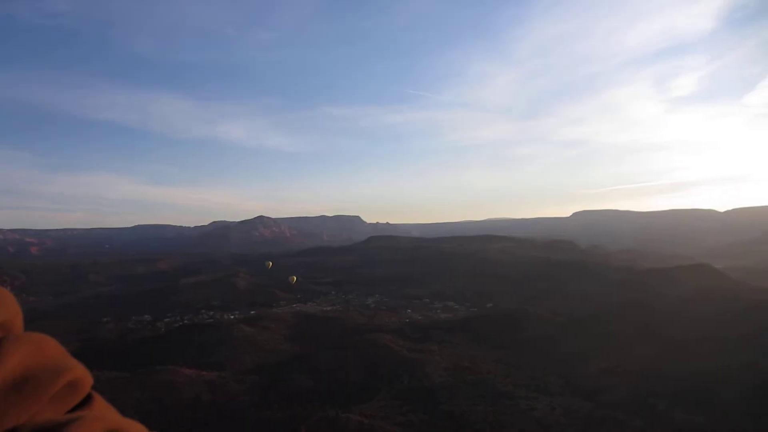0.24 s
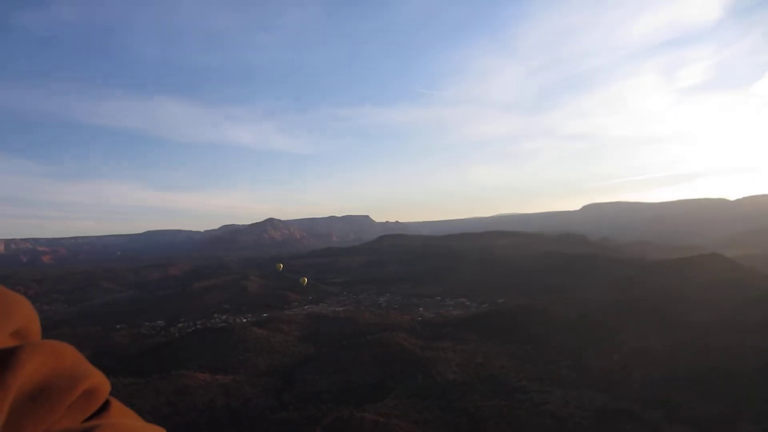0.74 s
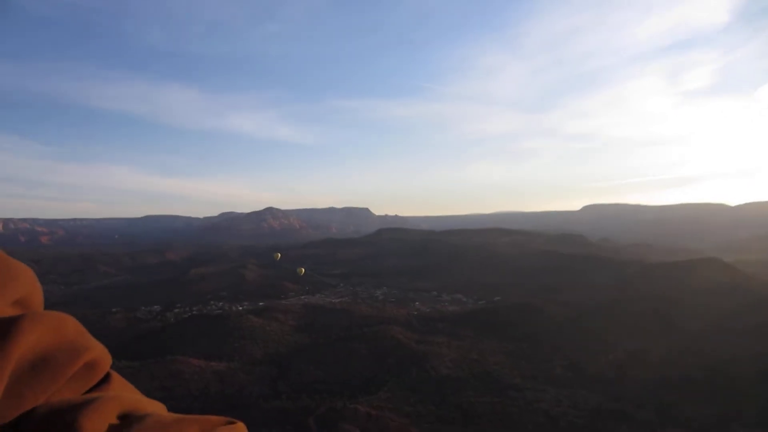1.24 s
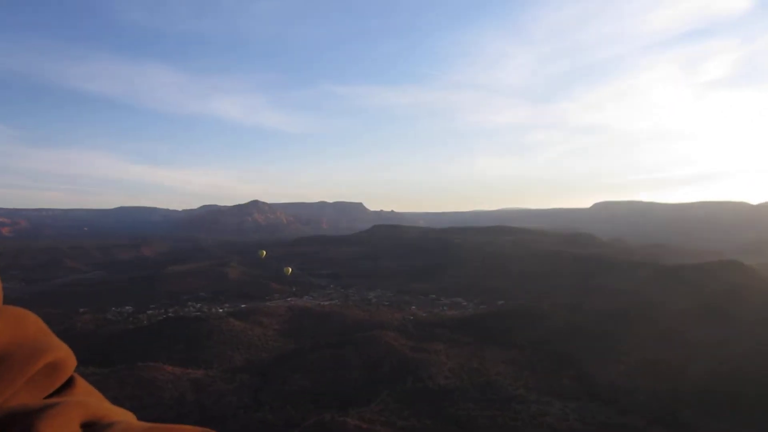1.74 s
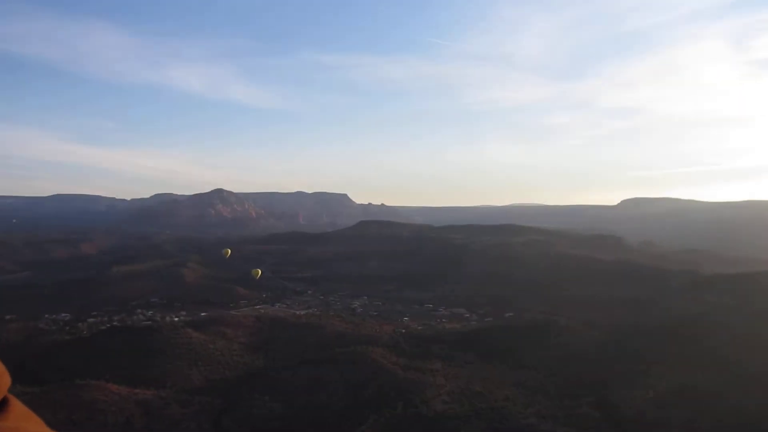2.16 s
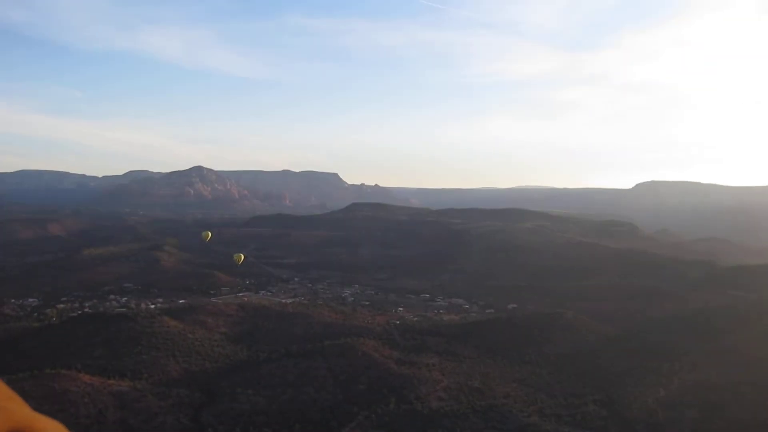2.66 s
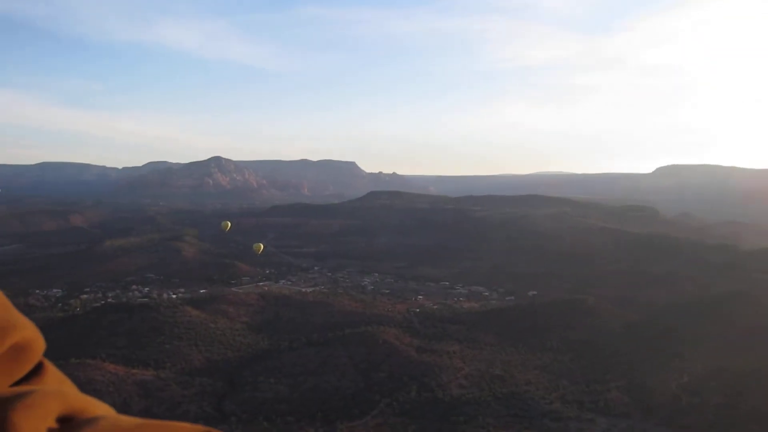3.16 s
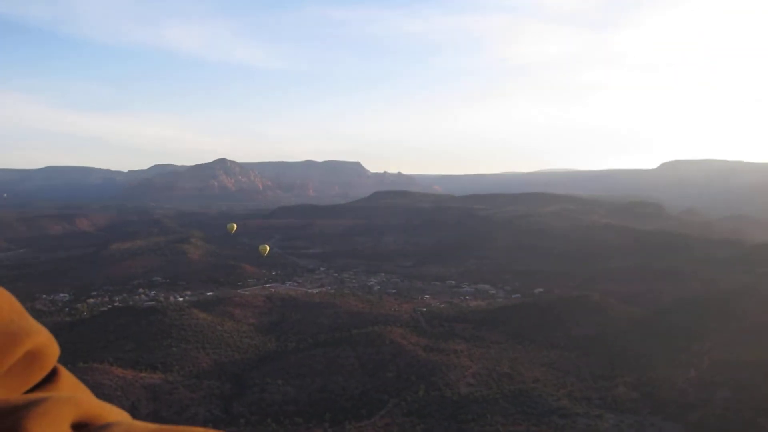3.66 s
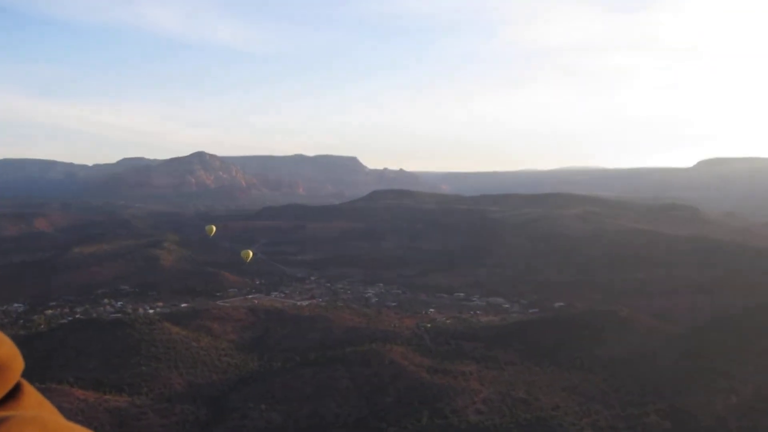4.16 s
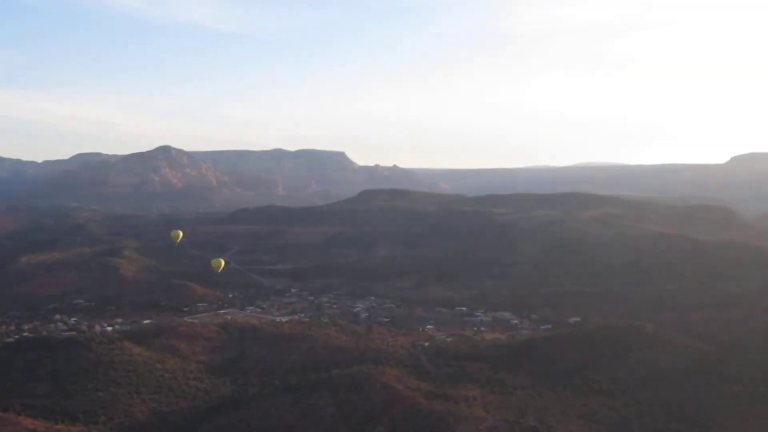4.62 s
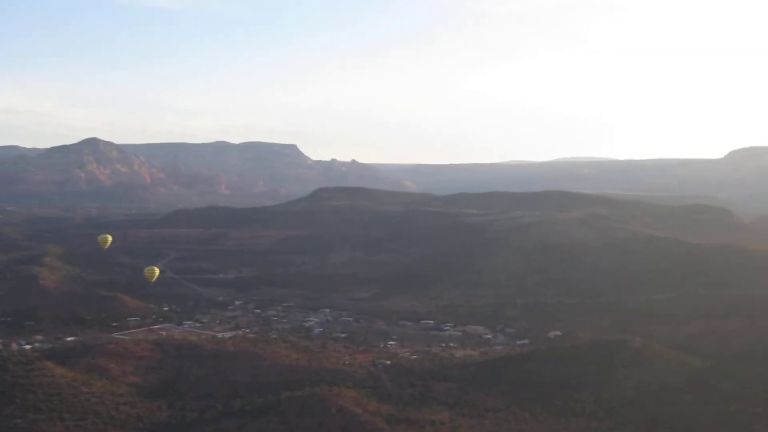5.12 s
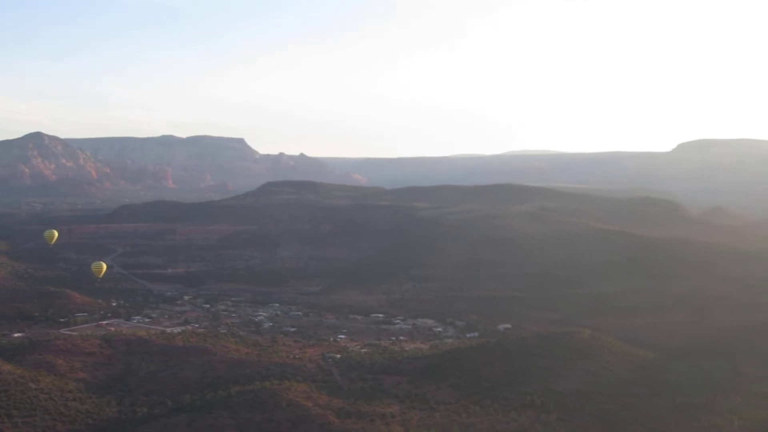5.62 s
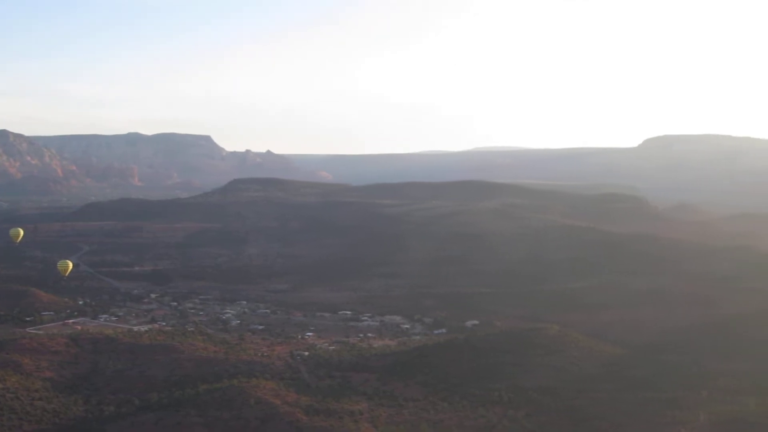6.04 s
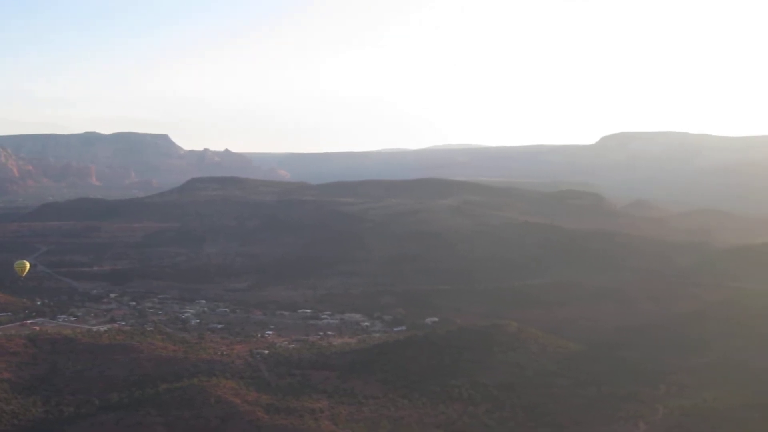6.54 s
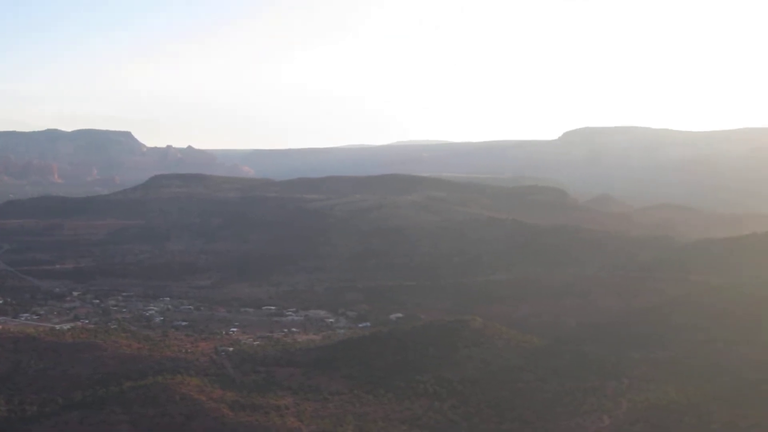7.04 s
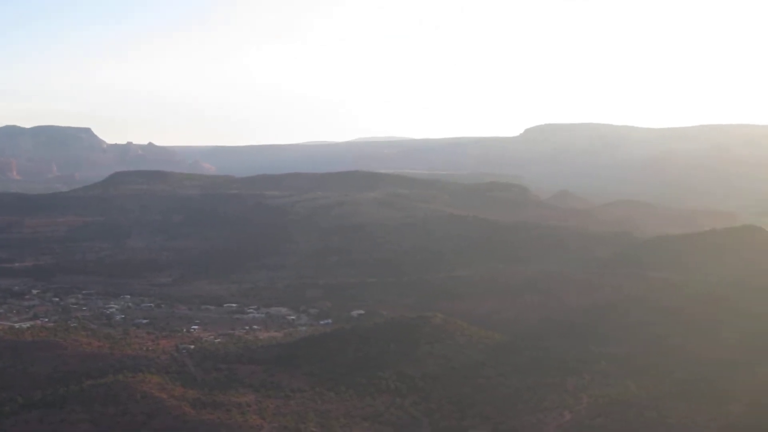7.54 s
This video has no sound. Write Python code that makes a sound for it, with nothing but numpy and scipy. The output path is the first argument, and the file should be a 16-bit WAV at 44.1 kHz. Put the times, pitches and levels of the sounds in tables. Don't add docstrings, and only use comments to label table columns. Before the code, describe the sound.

In an open balloon basket, a quiet singing pilot flame and light wind give way abruptly to a huge, close, continuous propane burner blast.

```python
import sys
import numpy as np
from scipy import signal
from scipy.fft import irfft, next_fast_len
from scipy.io import wavfile

SR = 44100
rng = np.random.default_rng(int(sys.argv[2]) if len(sys.argv) > 2 else 0)


def decibels_to_gain(level_db):
    exponent = np.asarray(level_db, float) / 20
    return 10 ** exponent


def master_out(mix):
    frames = np.transpose(np.atleast_2d(mix))
    ceiling = np.clip(frames, -1, 1)
    pcm = np.round(ceiling * 32767).astype(np.int16)
    wavfile.write(sys.argv[1], SR, pcm)


N = 343098
T = np.arange(N) / SR
HZ = np.maximum(np.fft.rfftfreq(next_fast_len(N), 1 / SR), 1)

# f/Hz, density/dB per Hz
ROAR_SPECTRUM = [(12, -85), (20, -28.5), (102, -9), (154, -0.5), (206, -6), (251, 0.5), (317, -3.5),
                 (367, -0.5), (439, -8), (489, -8), (597, -14.5), (653, -17), (841, -14.5), (1080, -25.5),
                 (1500, -36), (1950, -36), (3300, -120)]
JET_SPECTRUM = [(650, -14.5), (1100, -5.5), (1480, -6.5), (1960, 1), (2190, -4.5), (2760, -4), (3570, -13),
                (3980, -8), (5000, -14), (6500, -26), (11000, -120)]
HISS_SPECTRUM = [(2650, -11.5), (4500, -8), (4920, -3.5), (5690, 1.5), (6490, 0), (8380, 0.5), (9760, -4),
                 (11000, -9.5), (13000, -12.5), (14400, -7), (16500, -11)]
# level/dB, share of pressure swing [0-1], loss while cracked/dB, lift by flare/dB
ROAR_GAIN = (-15.5, 0.31, 9, 10)
JET_GAIN = (-31.5, 0.72, 6, 5)
HISS_GAIN = (-34, 0.68, 8, .6)
# t/s, level/dB
PRESSURE = [(2.63, -36.5), (2.67, -39.5), (2.71, -35.5), (2.79, -40), (3.06, -36.5), (3.41, -36.5),
            (4.07, -40.5), (4.64, -41.5), (4.71, -40), (5.23, -41), (5.28, -40.5), (5.58, -38.5),
            (5.87, -40), (7.35, -39.5), (7.38, -38), (7.74, -39.5)]
# from t/s, to t/s
OPENING = (2.53, 2.62)
# peak t/s, gone t/s
FLARE = (2.485, 2.537)
# f/Hz, width/Hz, lift/dB
COLD_COIL = [(1820, 170, 5), (2060, 200, -2.5), (2600, 160, 2.5)]
# f/Hz, likeness [-1 to 1]
FLAME_LIKENESS = [(60, 0.89), (92, 0.92), (140, 0.95), (210, 0.99), (330, 0.98), (500, 1), (770, 1),
                  (1170, 0.94), (1790, 1), (2740, 0.9), (4190, 0.72), (6410, 0.68), (9810, 0.79),
                  (15000, 0.55)]
# f/Hz, width/Hz, share of difference lost [0-1]
ALIKE_BANDS = [(654, 130, .6), (1980, 820, 0.7), (4220, 1700, 0.64), (11800, 2100, .52)]
# f/Hz, left minus right level/dB
LEFT_LOUDER = [(60, -2), (110, 0.5), (200, -1), (380, -0.5), (700, -1), (1290, -3.5), (2380, -2),
               (4400, -3), (8120, -0.5), (15000, -5)]
# f/Hz, left lead [rad]
LEFT_LEADS = [(30, 0.037), (3000, 0), (6400, 0.77), (8000, 0), (9500, .4), (12000, 0.05), (15700, 1)]
# start t/s, clamp-down from t/s, end t/s
THUMP = (2.465, 2.4905, 2.4965)
# f/Hz, level/dB
THUMP_MODES = [(55, -10), (128, 0.5), (185, -9), (270, -13), (396, -4), (480, -11), (610, -18), (800, -21)]
# t/s, peak level/dB, f/Hz, t60/s, left minus right level/dB
POP = [
    (2.6425, -5, 272, .03, -1),
]
# t/s, peak level/dB, f/Hz, t60/s, left minus right level/dB
VALVE_STOP = [
    (2.4465, -17, 330, .025, 0),
    (2.4465, -27, 2300, .01, 0),
    (2.4465, -36, 6500, .004, 0),
]
# from t/s, full open t/s, low f/Hz, high f/Hz, lifting level/dB, open level/dB
LEAK = (2.423, 5, 13200, 15600, -59, -54)
# f/Hz, density/dB per Hz
PILOT_SPECTRUM = [(18, -38), (40, -41), (100, -9.5), (250, -1), (600, -10.5), (1250, -17), (1570, -22.5),
                  (2200, -18.5), (2940, -25.5), (4500, -30.5), (7540, -33.5), (10800, -50), (13500, -55),
                  (16500, -49)]
# f/Hz, width/Hz, lift/dB
PILOT_RESONANCES = [(334, 190, 4.5), (824, 104, 7.5), (1250, 290, -6.5), (1590, 106, 11), (1756, 170, 9),
                    (2150, 110, -6.5), (2640, 166, 10.5), (4210, 54, 8.5), (4800, 280, -5),
                    (5090, 110, 11.5), (5480, 140, 9.5), (6060, 300, 6), (6880, 130, 4), (7620, 340, 10.5),
                    (9100, 400, 8.5)]
# f/Hz, likeness [-1 to 1]
PILOT_LIKENESS = [(60, 0.54), (200, 0.98), (700, 0.91), (2400, 1), (4400, 0.91), (8000, 0.73), (15000, .5)]
# t/s, peak level/dB, f/Hz, t60/s, left minus right level/dB
TICKS = [
    (.131, -28, 110, .05, 0),
    (.232, -28, 120, .05, 0),
    (.395, -32, 250, .04, 0),
    (.576, -36, 2000, .003, 16),
    (.645, -40, 2500, .006, 10),
    (.665, -44, 4500, .008, 6),
    (.793, -40, 2000, .008, 14),
    (0.804, -33, 1200, .005, 14),
    (2.276, -48, 3000, .015, 12),
    (2.388, -48, 5000, .004, 6),
]
# f/Hz, density/dB per Hz
WIND_SPECTRUM = [(12, -36), (20, -6), (49, -4), (102, -1.5), (195, -7), (300, -34), (500, -31), (1100, -64)]
# t/s, level above calm/dB, half length/s
GUSTS = [
    (.14, 6.9, 0.35),
    (.78, 4, .2),
    (1.25, 3, .2),
    (1.72, 7.2, .22),
]
# t/s, peak level/dB, f/Hz, t60/s
BUFFETS = [
    (0.126, -17, 110, .05),
    (.156, -16, 130, .04),
    (.378, -30, 120, .04),
    (.598, -24, 70, .06),
    (.826, -18, 90, .05),
]
# f/Hz, density/dB per Hz
CASE_SPECTRUM = [(120, -36), (200, -6), (387, -2), (493, -6), (572, -8), (1150, -6), (1590, -13),
                 (2450, -9), (5000, -29), (6500, -61), (11000, -120)]
# f/Hz, width/Hz, depth/dB
CAVITY_DIP = (11950, 1500, -11.5)
# from t/s, to t/s
ZOOMING = [
    (.742, 2.545),
    (3.781, 5.267),
]
# f/Hz, width/Hz, depth/dB
ZOOM_CUTS = [(4110, 1320, -11.5), (6100, 3300, -2.5)]
# t/s, size [full scale], t60/s
JUMPS = [
    (.742, .009, .0002),
    (2.5453, -.07, .0002),
    (3.7813, .2, .0002),
    (5.0862, -.29, .008),
]


def burner():
    roar = turbulence(at_hz(ROAR_SPECTRUM), FLAME_LIKENESS, count=6, patchy_db=0.55,
                      flicker_db=1.0, flicker_rate=27.5, agree=ALIKE_BANDS)
    jet = turbulence(at_hz(JET_SPECTRUM), FLAME_LIKENESS, count=4, patchy_db=0.0,
                     flicker_db=0.8, flicker_rate=15.0, agree=ALIKE_BANDS)
    hiss = turbulence(at_hz(HISS_SPECTRUM), FLAME_LIKENESS, count=3, patchy_db=-1.13,
                      flicker_db=0.4, flicker_rate=24.0, agree=ALIKE_BANDS)
    flowing = np.interp(T, [2.445, 2.448], [0, 1])
    lit = np.interp(T, [2.455, 2.492, 2.5], [0, .15, 1])
    surge_db = 3 * since_open(settle_s=0.77)
    burning = lit * decibels_to_gain(surge_db) * flame_gain(*ROAR_GAIN) * roar
    streaming = flame_gain(*JET_GAIN) * warming(jet) + flame_gain(*HISS_GAIN) * hiss
    return burning + flowing * streaming


def flame_gain(level_db, follows, cracked_db, flare_db):
    pressure_db = np.interp(T, *np.transpose(PRESSURE))
    swing_db = pressure_db - pressure_db[T > OPENING[1]].mean()
    cracked = np.interp(T, OPENING, [1, 0])
    flare = np.interp(T, [THUMP[0], *FLARE], [0, 1, 0])
    return decibels_to_gain(level_db + follows * swing_db - cracked_db * cracked + flare_db * flare)


def warming(x):
    cold = x
    for hz, width, db in COLD_COIL:
        cold = bell(cold, hz, width, db)
    return x + (cold - x) * since_open(settle_s=1.3)


def since_open(settle_s):
    return np.exp(-np.maximum(T - OPENING[1], 0) / settle_s)


def thump():
    start, clamping, end = THUMP
    swell = np.interp(T, [start, start + 0.0067, clamping, end], [0.2, 0.64, 0.49, 0])
    swell = swell * (T > start) * (T < end)
    modes = 0
    for k, (hz, db) in enumerate(THUMP_MODES):
        modes = modes + decibels_to_gain(db) * np.sin(2 * np.pi * hz * (T - start) + k * np.pi)
    return -swell * modes


def leak():
    start, opened, low_hz, high_hz, lifting_db, open_db = LEAK
    band = signal.butter(3, [low_hz, high_hz], "band", fs=SR, output="sos")
    hiss = rms_one(signal.sosfilt(band, rng.standard_normal((2, N))))
    lifting = np.clip((T - start) / .006, 0, 1)
    return decibels_to_gain(np.where(T < opened, lifting_db, open_db)) * lifting * hiss


def pilot():
    lift_db = sum(db / (1 + (2 * (HZ - hz) / width) ** 2) for hz, width, db in PILOT_RESONANCES)
    flame = turbulence(at_hz(PILOT_SPECTRUM) + lift_db, PILOT_LIKENESS, count=8, patchy_db=0.7,
                       flicker_db=0.35, flicker_rate=6.9)
    level_db = -36.5 - 5 * np.exp(-T / 0.79)
    return ducked() * decibels_to_gain(level_db) * flame


def ducked():
    return np.interp(T, [2.47, 2.5], [1, 0])


def damped_rings():
    out, t = np.zeros((2, N)), T[1:2000]
    for s, db, hz, t60, pan_db in POP + VALVE_STOP + TICKS:
        ring = decibels_to_gain(db - 60 * t / t60) * np.sin(2 * np.pi * hz * t)
        first = round(s * SR)
        out[:, first:first + len(t)] += ring * decibels_to_gain([[pan_db / 2], [-pan_db / 2]])
    return out


def wind():
    gusts = turbulence(at_hz(WIND_SPECTRUM), [(20, -0.79), (500, -0.15)], count=2, patchy_db=2.0,
                       flicker_db=3.5, flicker_rate=13.0)
    level_db = -44 + sum(db * np.exp(-((T - s) / half) ** 2) for s, db, half in GUSTS)
    return ducked() * decibels_to_gain(level_db) * gusts


def buffets():
    push = 0
    for s, db, hz, t60 in BUFFETS:
        t = np.clip(T - s, 0, 1)
        push = push - decibels_to_gain(db - 60 * t / t60) * np.sin(2 * np.pi * hz * t)
    return push * [[.8], [-1]]


def case_rustle():
    rustle = turbulence(at_hz(CASE_SPECTRUM), [(20, -.7), (5000, -0.9)], count=3, patchy_db=1.5,
                        flicker_db=5.0, flicker_rate=14.0)
    return decibels_to_gain(np.where(T > ZOOMING[0][0], -53.5, -59)) * rustle


def turbulence(colour_db, likeness, count, patchy_db, flicker_db, flicker_rate, agree=()):
    differ = 1 - sum(np.clip(lost, 0, 1) * np.exp(-(2 * (HZ - hz) / width) ** 2)
                     for hz, width, lost in agree)
    unlike = (1 - np.clip(at_hz(likeness), -.999, .999)) * differ ** 2
    mid, side = rng.standard_normal((2, len(HZ))) + 1j * rng.standard_normal((2, len(HZ)))
    both = np.sqrt(2 - unlike) * mid + np.sqrt(unlike) * side * [[1], [-1]]
    port = decibels_to_gain(differ * at_hz(LEFT_LOUDER) / 2) * np.exp(.5j * differ * at_hz(LEFT_LEADS))
    both = decibels_to_gain(colour_db) * both * [port, 1 / port]
    heard = HZ[colour_db > colour_db.max() - 45]
    place = np.interp(np.log(HZ), np.log([heard[0], heard[-1]]), [0, count - 1])
    together_db = flicker_db * drift(flicker_rate)
    out = 0
    for k in range(count):
        share = np.clip(1 - np.abs(place - k), 0, 1)
        band = irfft(both * share)[:, :N]
        out = out + band * decibels_to_gain(together_db + patchy_db * drift(19.4))
    return rms_one(out)


def drift(rate):
    r = np.exp(-40 * np.pi * rate / SR)
    slow = signal.lfilter([1], [1, -2 * r, r * r], rng.standard_normal(N // 20 + 4002))[4000:]
    return np.interp(np.arange(N) / 20, np.arange(len(slow)), rms_one(slow))


def at_hz(points):
    hz, value = np.transpose(points)
    return np.interp(np.log(HZ), np.log(hz), value)


def rms_one(x):
    return x / np.sqrt(np.mean(x ** 2) + 1e-20)


def bell(x, hz, width, db):
    a, w = decibels_to_gain(db / 2), 2 * np.pi * hz / SR
    alpha = np.sin(w) * width / hz / 2
    zeros = [1 + alpha * a, -2 * np.cos(w), 1 - alpha * a]
    poles = [1 + alpha / a, -2 * np.cos(w), 1 - alpha / a]
    return signal.lfilter(zeros, poles, x)


def scene():
    airborne = burner() + thump() + leak() + pilot() + wind()
    return bell(airborne, *CAVITY_DIP) + damped_rings() + case_rustle() + buffets()


def zoom_filter(x):
    cut = bell(bell(x, *ZOOM_CUTS[0]), *ZOOM_CUTS[1])
    zooming = sum((T > a) & (T < b) for a, b in ZOOMING) > 0
    return np.where(zooming, cut, x)


def jumps():
    return sum(size * (T >= s) * decibels_to_gain(-60 * np.clip(T - s, 0, 1) / t60) for s, size, t60 in JUMPS)


def low_pass(x):
    return signal.sosfilt(signal.butter(12, 16940, fs=SR, output="sos"), x)


def record(dry):
    x = zoom_filter(dry) + jumps()
    x = x / (1 + np.abs(x / 1.05) ** 12) ** (1 / 12)
    top_cut = signal.ellip(12, .5, 60, 15720, fs=SR, output="sos")
    x = signal.sosfilt(top_cut, x)
    mix = x * (T > .0598)
    return low_pass(mix)


dry = scene()
out = record(dry)
master_out(out)
```